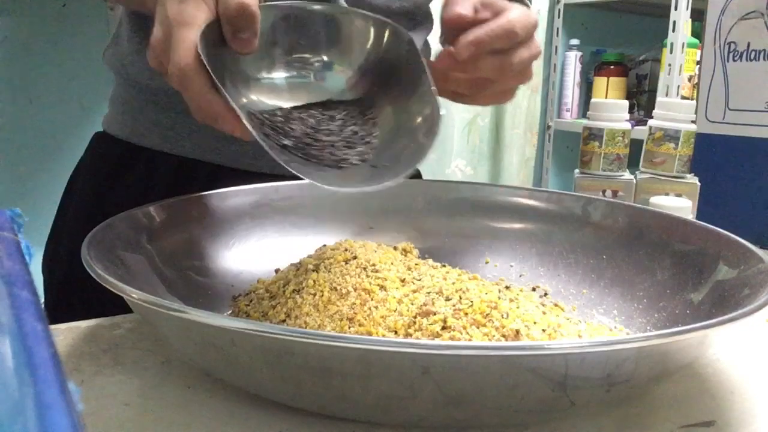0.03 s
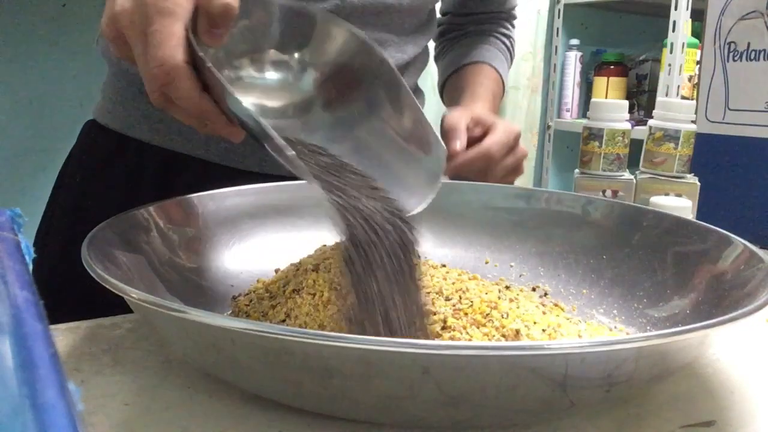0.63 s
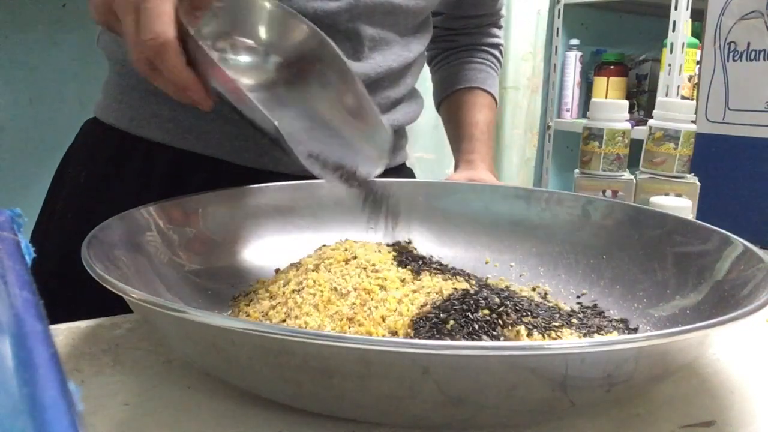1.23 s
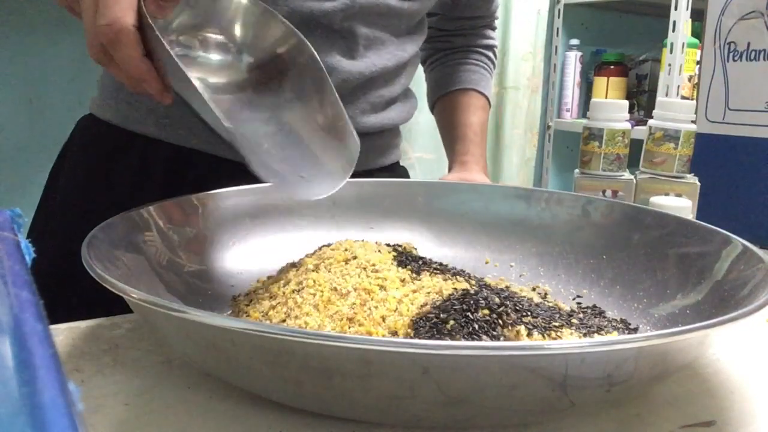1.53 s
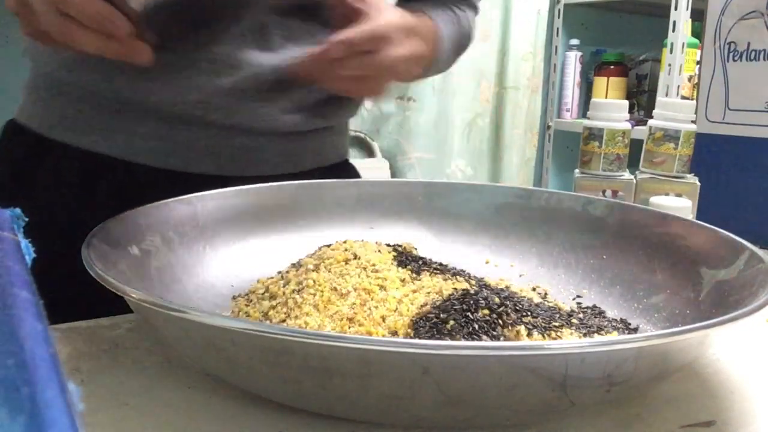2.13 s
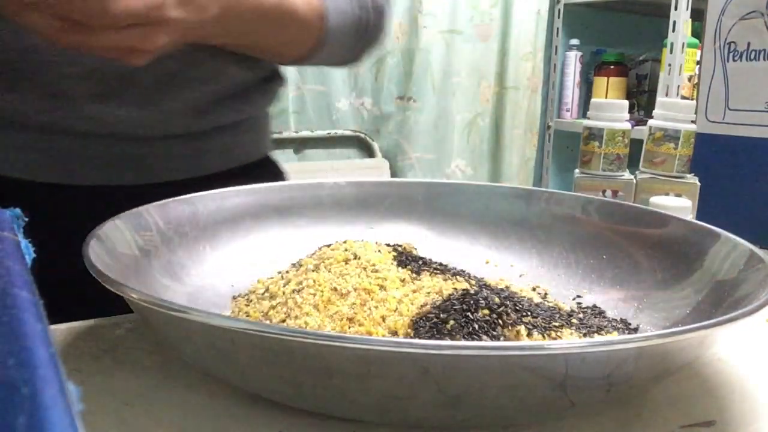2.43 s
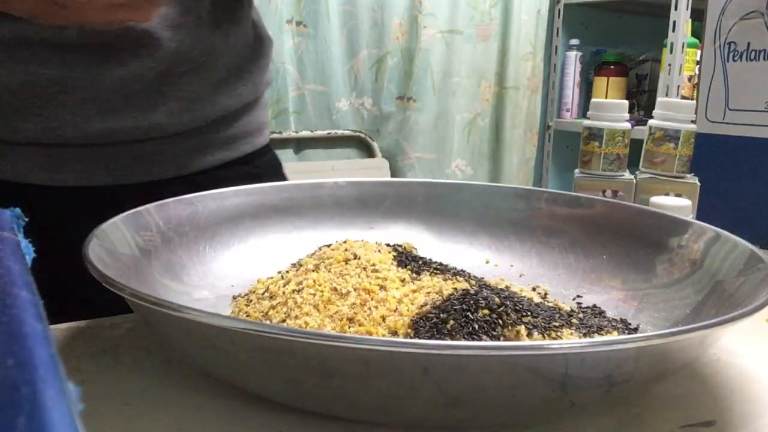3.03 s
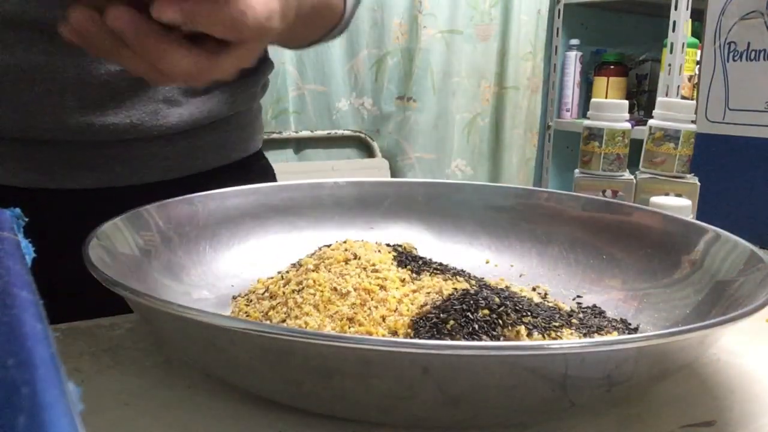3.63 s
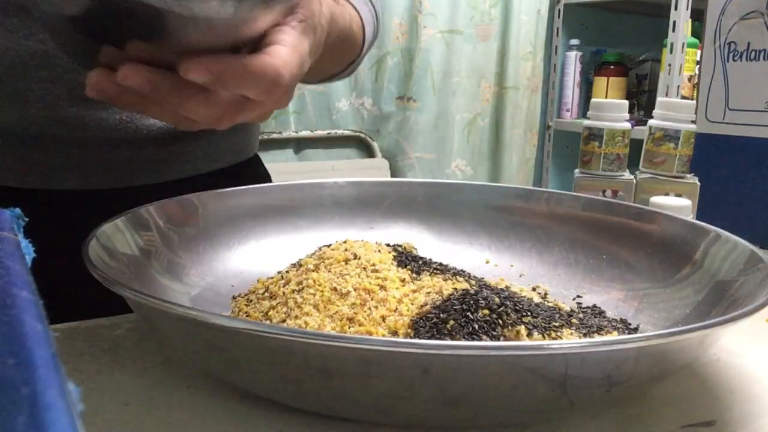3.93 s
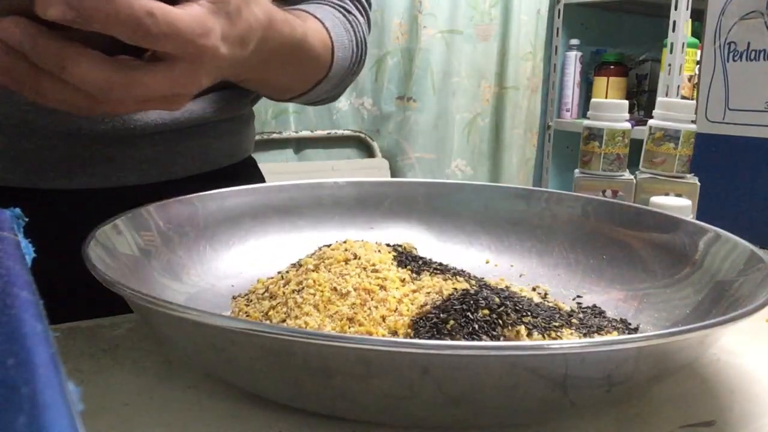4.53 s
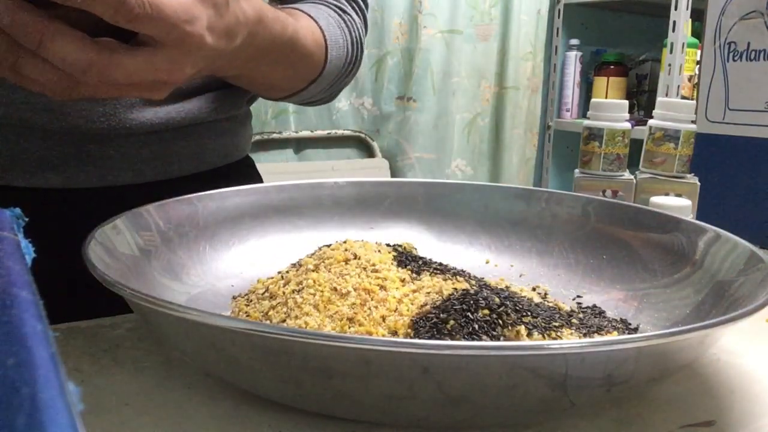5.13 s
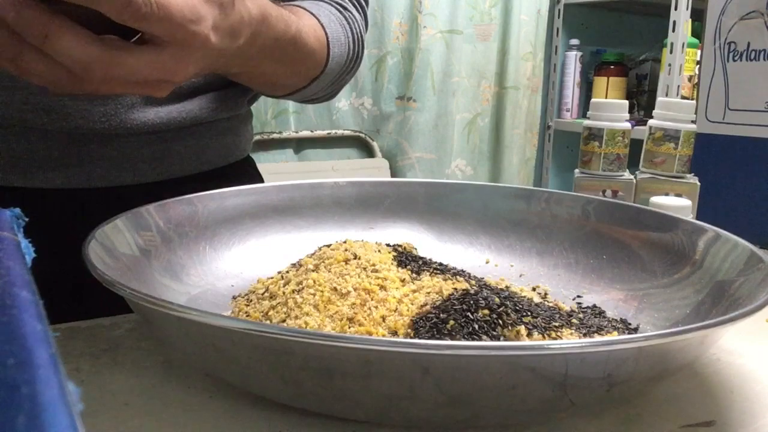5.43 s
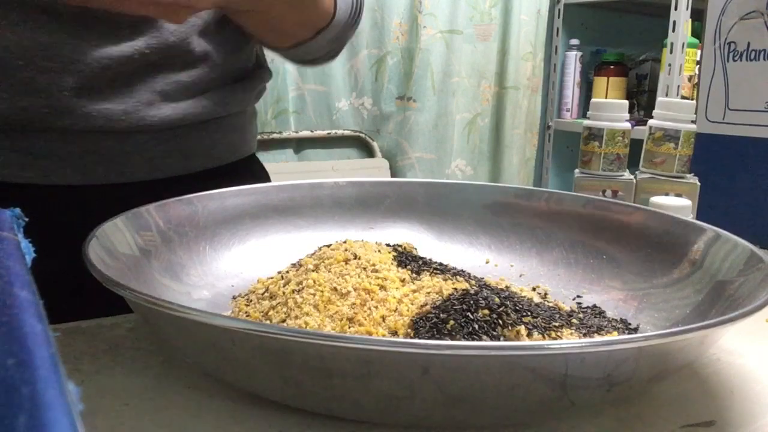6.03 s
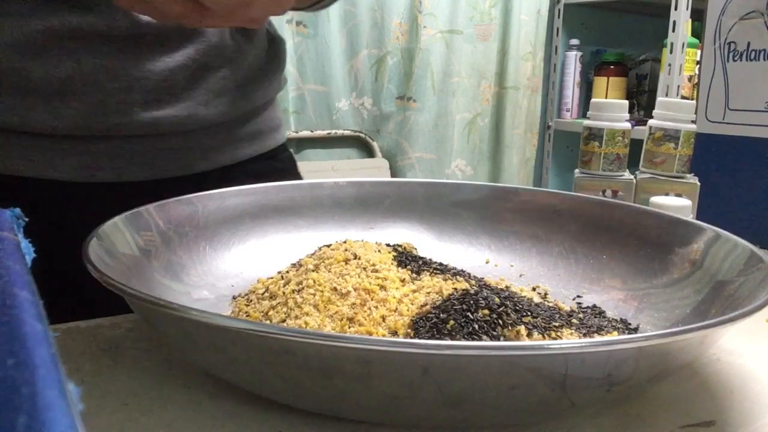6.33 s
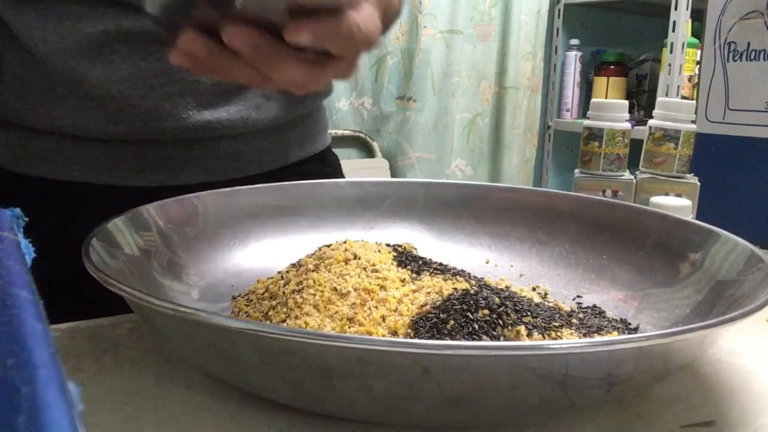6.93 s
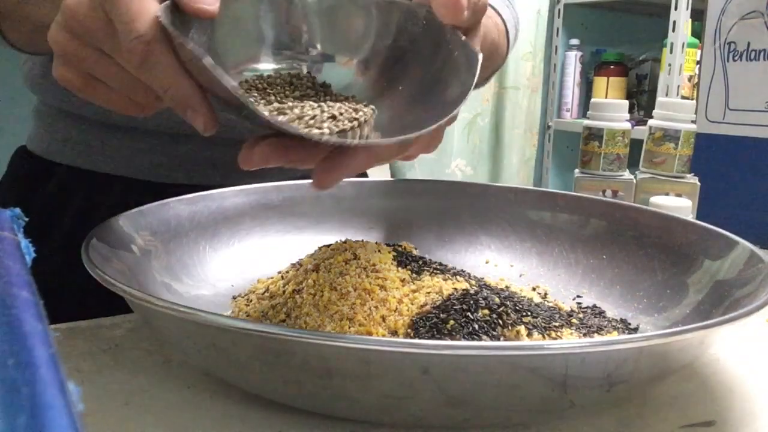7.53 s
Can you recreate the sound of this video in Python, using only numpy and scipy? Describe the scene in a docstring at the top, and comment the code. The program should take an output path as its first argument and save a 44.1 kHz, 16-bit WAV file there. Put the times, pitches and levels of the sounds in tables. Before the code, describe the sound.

Dry seeds hiss off a metal scoop and patter onto a heap of crumbs in a steel bowl. A plastic packet crackles as it is picked up, then more seeds rain into the scoop, making it ring lightly. The packet rustles away amid a few hollow knocks. Cage birds chirp and rasp throughout, a few metres from the close microphone in a small, hard-walled room.

```python
"""A small hard-walled room, one microphone close to a wide steel bowl, cage birds a few metres off.
The birds chirp and rasp from the start and throughout, as seeds hiss off a metal scoop and patter onto
a heap of crumbs in the bowl. Now and then a soft low flutter is heard. At 2.6 s a crackly plastic packet
is picked up, then tipped: seeds rain into the scoop and set it ringing. From 6 s the packet is folded
and put away, and a few seeds creep as the full scoop is tilted."""
import sys
import numpy as np
from scipy import signal
from scipy.fft import rfft, irfft
from scipy.io import wavfile

SR = 44100
rng = np.random.default_rng(int(sys.argv[2]) if len(sys.argv) > 2 else 0)


def int16_out(signal):
    """Quantize to a 16-bit WAV file."""
    q = np.round(np.clip(np.atleast_2d(signal).T, -1, 1) * 32767)
    wavfile.write(sys.argv[1], SR, q.astype(np.int16))


N = 342657
TIME = np.arange(N) / SR

# Every level_db is relative within its table; colours and layer gains follow.
# seeds sliding off the scoop: time_s, level_db
SLIDE = [(0, -51.5), (0.2, -58.5), (0.46, -49), (0.52, -42), (0.64, -50), (1.05, -50.5), (1.28, -61.5),
         (1.56, -66.5), (1.76, -92)]
# clumps of seeds landing on the soft heap: start_s, attack_s, hold_s, release_s, level_db
LANDINGS = [(0.43, 0.12, .01, 0.11, -53), (.58, 0.11, 0.0091, .45, -53.5)]
# seeds creeping as the full scoop is tilted: start_s, attack_s, hold_s, release_s, level_db
CREEPS = [(7.28, 0.1, .01, 0.22, -72), (7.58, 0.093, .01, .2, -66)]
# ringing of the metal scoop: pitch_hz, width_hz, level_db
SCOOP_MODES = [(2360, 37, 11.5), (3584, 75, 9.5), (4650, 26, 9), (5900, 38, 7), (6600, 36, -25),
               (8740, 35, 6), (9820, 134, 6.5), (11220, 130, 3.5), (11700, 110, -10)]
# hoarse calls: start_s, length_s, centre_hz, level_db
RASPS = [(0, 0.028, 3270, -34), (1.786, 0.064, 2400, -47), (1.973, 0.067, 3130, -48),
         (2.183, 0.038, 2780, -44), (3.285, 0.066, 2920, -42.5), (3.397, 0.034, 5060, -40),
         (7.299, .14, 3270, -44.5), (7.609, 0.11, 3540, -41.5), (7.741, 0.071, 4100, -39)]
# pitched calls: start_s, length_s, mid_pitch_hz, level_db, roughness (0-1)
CHIRPS = [(0.03, 0.072, 3780, -32.5, 0.22), (.825, 0.05, 3160, -35.5, 0.11), (.951, .12, 2710, -46.5, .4),
          (1.308, .052, 4400, -35.5, .33), (1.317, 0.042, 2160, -48.5, 0.48),
          (1.441, .06, 3583, -39.5, 0.2), (1.543, 0.06, 3460, -40.5, .27), (1.836, .089, 2650, -52.5, .4),
          (2.055, 0.074, 3580, -42, 0.2), (2.419, 0.069, 3060, -43, 0.37),
          (2.483, 0.058, 2877, -42.5, 0.69), (3.26, .049, 3444, -36.5, .33),
          (3.342, .05, 2997, -40.5, 0.34), (5.112, 0.065, 4257, -31.5, 0.46),
          (5.723, 0.059, 3150, -41.5, 0.56), (5.795, 0.054, 3047, -41.5, 0.45),
          (6.914, .082, 3210, -43, 0.46), (6.977, .099, 2630, -47, 0.58)]
WHISTLES = [(.28, 0.058, 4544, -52.5, .08), (.445, 0.12, 4754, -48, 0.07), (.878, 0.0543, 3830, -26, .3),
            (1.455, 0.038, 1760, -55, 0.08), (1.643, 0.031, 5130, -45, 0.09),
            (2.245, 0.0864, 4006, -30, .24), (3.129, 0.078, 2980, -51.5, 0.03),
            (3.398, 0.032, 5990, -40, 0)]
SQUAWKS = [(.766, 0.046, 3710, -36.5, 0.3), (.797, 0.035, 5480, -23.5, 0.4),
           (2.201, 0.067, 3780, -33, 0.42), (3.195, 0.025, 4070, -36.5, 0.38),
           (5.188, .15, 3696, -33.5, .4), (6.594, 0.066, 3470, -44.5, 0.76)]
# soft low flutters: start_s, length_s, level_db
FLUTTERS = [(0.771, 0.18, -48), (2.22, 0.12, -55), (2.999, 0.16, -37), (6.53, 0.12, -48)]
# the last seeds of each pour: start_s, attack_s, hold_s, release_s, level_db
STRAGGLERS = [(1.3, .15, .15, .1, -65.5), (5.45, .2, 0.24, .15, -54)]
# the packet lifted and gripped, later folded and put down: start_s, attack_s, hold_s, release_s, level_db
RUSTLES = [(2.58, 0.087, 0.19, 0.11, -45), (2.78, 0.13, 0.22, .05, -40), (3.03, 0.053, 0.027, 0.033, -36.5),
           (6.04, .22, 0.53, 0.17, -43.5), (6.58, 0.11, 0.14, 0.1, -44), (6.9, 0.052, 0.011, 0.074, -36)]
# creases of the packet snapping: start_s, level_db
CREASES = [(2.8837, -31.5), (2.9066, -24.5), (2.926, -23.5), (2.9387, -21), (3.0002, -25), (3.0039, -22),
           (3.017, -23), (3.046, -20.5), (3.068, -16.5), (3.082, -18.5), (3.0935, -18.5), (3.1024, -23),
           (3.1094, -25), (4.677, -29), (4.6965, -26.5), (4.92, -33.5), (6.408, -34.5), (6.4119, -30),
           (6.796, -33), (6.8118, -29), (6.9532, -38)]
# single seeds hitting the scoop: start_s, level_db
TICKS = [(2.6419, -35), (3.6352, -33), (3.655, -34.5), (3.916, -40), (4.535, -38), (4.5782, -27.5),
         (4.6454, -30), (5.585, -37.5), (5.7393, -30), (5.7641, -32), (5.8253, -35.5), (5.876, -39.5),
         (6.0218, -36.5), (6.055, -33), (6.5458, -36)]
# seeds shifting in the packet as it tips: start_s, attack_s, hold_s, release_s, level_db
SHIFTS = [(3.68, 0.27, 0.93, 2.1, -43.5), (3.92, 0.095, 0.013, 0.087, -37), (4.28, 0.067, .01, 0.08, -49),
          (6.08, 0.14, 0.045, .16, -43.5), (6.36, 0.07, 0.12, 0.11, -45.5)]
# trickle, main pour, surge and last shake into the scoop: start_s, attack_s, hold_s, release_s, level_db
REFILL_POURS = [(3.8, 0.26, 1.52, .4, -58), (4.47, 0.28, 0.6, .36, -37), (4.76, .11, 0.014, 0.11, -37.5),
                (5.7, 0.072, 0.014, 0.15, -49)]
# hollow knocks of the scoop being handled: start_s, pitch_hz, level_db
KNOCKS = [(2.649, 845, -37), (2.6745, 990, -36.5), (2.7954, 1300, -27), (3.2586, 1390, -37),
          (3.367, 1140, -35.5), (3.591, 2000, -42), (3.6395, 1480, -41), (4.001, 1600, -25),
          (5.9655, 1460, -37.5), (6.322, 1400, -33), (6.7011, 700, -29.5), (6.9534, 1087, -32),
          (7.078, 2680, -29)]

# spectrum of each sound: frequency_hz, level_db
SLIDE_COLOUR = [(700, -27), (2000, -5.5), (3500, 3), (5300, -1), (7000, 7), (10000, 5.5), (12500, 8),
                (16000, -0.5)]
LANDING_COLOUR = [(200, -13), (600, -14), (1000, -0.5), (1500, -4), (1800, -5), (2500, -3), (4000, -5),
                  (9000, -28)]
VOICE_COLOUR = [(800, -9.5), (2000, -0.5), (3700, 0.5), (5000, -2), (6700, -0.5), (8000, 2), (9500, 2.5),
                (10400, -6.5), (11500, 2), (13000, -8), (16000, -11)]
FLUTTER_COLOUR = [(30, -49), (80, -0.5), (160, -1.5), (280, -11.5), (500, -16), (1200, -27)]
TICK_COLOUR = [(800, -30), (2500, 0), (6000, -1), (8000, 6.5), (10000, 4), (13000, 6), (16000, -1)]
RUSTLE_COLOUR = [(40, -4.5), (90, -3), (200, -3), (400, -3), (800, -1.5), (1300, -1.5), (2500, -6),
                 (4800, -11), (7500, -9.5), (12000, -20), (16000, -30)]
CRACK_COLOUR = [(1000, -7), (3000, 0), (5000, -0.5), (6800, 3), (9000, -6), (13000, -9.5), (16000, -17)]
POP_COLOUR = [(50, -44), (170, 2), (350, 2), (800, -0.5), (1250, 2), (2500, -4), (4000, -4), (9000, -50)]
SHIFT_COLOUR = [(80, -16), (300, -15), (550, -5), (850, -8.5), (1400, 4), (2100, 0.5), (2600, 3),
                (3800, -1.5), (5000, -9.5), (9000, -11.5), (16000, -30)]
REFILL_COLOUR = [(900, -23), (2000, -6.5), (3300, -6.5), (4300, -3), (5300, -5), (6000, -2.5), (7000, 5.5),
                 (8000, 1), (10500, -1.5), (11400, 2), (12600, 8), (13600, 1.5), (16000, 5.5)]
ROOM_TONE_COLOUR = [(20, -40), (40, -5), (53, 3), (70, 2), (110, -3.5), (200, -9), (400, -13), (900, -18),
                    (2000, -15.5), (3500, -13), (7000, -23), (16000, -36.5)]


def from_db(db):
    """Decibels to gain."""
    return 10 ** (np.asarray(db) / 20)


def rms_one(x):
    """Scale to rms 1."""
    return x / np.sqrt(np.mean(x ** 2) + 1e-20)


def add(track, start_s, sound):
    """Mix a short sound in at start_s."""
    start = int(np.clip(round(start_s * SR), 0, N - 1))
    track[start:start + len(sound)] += sound[:N - start]


def level_curve(rows, fade_s=0.011):
    """Gain along a dB curve, fading to silence outside it."""
    time_s, db = np.transpose(rows)
    inside_s = np.minimum(TIME - time_s[0], time_s[-1] - TIME)
    return from_db(np.interp(TIME, time_s, db)) * np.clip(inside_s / fade_s + 1, 0, 1)


def swells(rows):
    """Gain of overlapping gestures, each with an attack, a hold and a release."""
    gain = np.zeros(N)
    for start_s, attack_s, hold_s, release_s, db in rows:
        corners_s = np.cumsum([0, attack_s, hold_s, release_s])
        gain += from_db(db) * np.interp(TIME - start_s, corners_s, [0, 1, 1, 0]) ** 2
    return gain


def drift(hz, length):
    """Smooth random motion of rms 1, mostly slower than hz."""
    pole = np.exp(-2 * np.pi * hz / SR)
    noise = rng.standard_normal(length + SR // 10)
    return rms_one(signal.lfilter([1], [1, -2 * pole, pole * pole], noise)[-length:])


def coloured(x, colour, size=4096):
    """Minimum-phase filter of unit energy with the given spectrum."""
    hz, db = np.transpose(colour)
    grid_hz = np.maximum(np.fft.rfftfreq(size, 1 / SR), 1)
    gain = from_db(np.interp(np.log(grid_hz), np.log(hz), db))
    cepstrum = irfft(np.log(gain))
    causal = 2 * cepstrum[:size // 2] * (np.arange(size // 2) > 0)
    response = irfft(np.exp(rfft(causal, size)))
    return signal.oaconvolve(x, response / np.linalg.norm(response))[:len(x)]


def resonance(x, hz, width_hz):
    """Two-pole resonance with gain 1 at its peak."""
    radius = np.exp(-np.pi * width_hz / SR)
    feedback = [1, -2 * radius * np.cos(2 * np.pi * hz / SR), radius ** 2]
    return signal.lfilter(np.array([1, 0, -1]) * (1 - radius ** 2) / 2, feedback, x + 1e-18)


def grains(gain, per_s, spread_db, clump_db, clump_hz):
    """Random collisions of uneven size, in clumps; about per_s a second at the strongest flow."""
    chance = np.clip(per_s * (gain / gain.max() + 0.041) / SR, 1e-6, 1)
    sizes = from_db(spread_db * np.minimum(rng.exponential(1, N), 5))
    kicks = rms_one(sizes * rng.choice([-1, 1], N))
    clumps = rms_one(from_db(clump_db * drift(clump_hz, N)))
    return gain * clumps * kicks * (rng.random(N) < chance) / np.sqrt(chance)


def burst(decay_s, tail_s, size=2048):
    """A jagged contact noise with a weak tail; it has the energy of 4 ms at rms 1."""
    t = np.arange(size) / SR
    envelope = np.exp(-t / decay_s) + from_db(-19) * np.exp(-t / tail_s)
    sound = rng.standard_normal(size) * envelope
    return sound / np.linalg.norm(sound) * np.sqrt(0.004 * SR)


def scoop(hits, colour, ring_db):
    """Seed husks click and set the thin metal ringing."""
    ringing = sum(from_db(db) * resonance(hits, hz, width_hz) for hz, width_hz, db in SCOOP_MODES)
    return coloured(hits + from_db(ring_db) * ringing, colour)


def sliding_seeds():
    """Seeds hiss over the scoop and patter on the heap; at the end a few creep in the scoop."""
    flow = level_curve(SLIDE) + swells(CREEPS)
    sliding = grains(flow, per_s=11000, spread_db=1.5, clump_db=1, clump_hz=40)
    landing = grains(swells(LANDINGS), per_s=2500, spread_db=1, clump_db=1, clump_hz=30)
    hiss = scoop(sliding, SLIDE_COLOUR, ring_db=-5.5)
    return from_db(5.5) * hiss + from_db(4) * coloured(landing, LANDING_COLOUR)


def bird_rasps(buzz_hz=780, jitter=0.11, hiss=0.52, lower_width_hz=2300, upper_width_hz=4400):
    """Unsteady pulses with some hiss, through two broad resonances of the bird's throat."""
    out = np.zeros(N)
    for start_s, length_s, hz, db in RASPS:
        n = int(length_s * SR)
        cycles = np.cumsum(buzz_hz * (1 + jitter * drift(40, n))) / SR
        pulses = np.diff(np.floor(cycles), prepend=0) * from_db(2.3 * drift(220, n))
        buzz = rms_one(pulses) + hiss * rng.standard_normal(n)
        upper_hz = 1.27 * hz
        lower = resonance(resonance(buzz, hz, lower_width_hz), hz, lower_width_hz)
        upper = resonance(resonance(buzz, upper_hz, upper_width_hz), upper_hz, upper_width_hz)
        throat = rms_one(lower) + from_db(-1) * rms_one(upper)
        add(out, start_s, from_db(db) * rms_one(throat * signal.windows.hann(n)))
    return signal.sosfilt(signal.butter(4, 10000, fs=SR, output="sos"), out)


def bird_calls(rows, glide_octaves, waver_hz=130, pitch_swing=0.1366, swing_db=8, full_voice_db=-34.5):
    """Gliding tones, brighter when louder; a rough one wavers in pitch and level."""
    out = np.zeros(N)
    for start_s, length_s, hz, db, roughness in rows:
        n = int(length_s * SR)
        glide_hz = hz * 2 ** (glide_octaves * np.linspace(-0.5, 0.5, n))
        pitch_hz = glide_hz * (1 + pitch_swing * roughness * drift(waver_hz, n))
        phase = 2 * np.pi * np.cumsum(pitch_hz) / SR
        # a slower membrane of the syrinx adds sidebands
        phase += 1.6 * roughness * np.sin(0.24 * phase + drift(waver_hz, n))
        overtones = np.sin(2 * phase) + from_db(-11) * np.sin(3 * phase)
        overtones_db = -7 - 1.67 * max(full_voice_db - db, 0)
        tone = np.sin(phase) + from_db(overtones_db) * overtones
        tone *= from_db(swing_db * roughness * drift(waver_hz, n))
        add(out, start_s, from_db(db) * rms_one(tone * signal.windows.tukey(n, 0.4)))
    return out


def far_chatter(count=24, length_s=0.049, range_hz=(1620, 3530), level_db=-60.5):
    """Birds in the farther cages call softly at random; gives rows like those of CHIRPS."""
    return [(when * N / SR, length_s, np.interp(pitch, [0, 1], range_hz), level_db, roughness / 2)
            for when, pitch, roughness in rng.random((count, 3))]


def cage_birds():
    """Chirps fall, squawks rise harshly, whistles stay nearly level; hoarse calls come between."""
    chirps = bird_calls(CHIRPS + far_chatter(), glide_octaves=-0.3)
    squawks = bird_calls(SQUAWKS, glide_octaves=0.36)
    whistles = bird_calls(WHISTLES, glide_octaves=-0.03)
    return from_db(-4) * coloured(chirps + squawks + whistles + bird_rasps(), VOICE_COLOUR)


def flutters():
    """Brief lumpy puffs in the bass."""
    out = np.zeros(N)
    for start_s, length_s, db in FLUTTERS:
        n = int(length_s * SR)
        add(out, start_s, from_db(db) * signal.windows.tukey(n, 0.5) * rng.standard_normal(n))
    return coloured(out, FLUTTER_COLOUR)


def stragglers():
    """Sparse seeds bounce on the metal as a pour runs out."""
    bounces = grains(swells(STRAGGLERS), per_s=100, spread_db=1.5, clump_db=1, clump_hz=16)
    return from_db(1) * scoop(bounces, TICK_COLOUR, ring_db=5)


def packet(wall_hz=(1000, 2100), firm_crack_db=-23, firm_pop_db=-29):
    """Each crease cracks and pops a patch of plastic wall at its own pitch, over small crinkles."""
    cracks, pops = np.zeros(N), np.zeros(N)
    for start_s, crack_db in CREASES:
        add(cracks, start_s, from_db(crack_db) * burst(decay_s=0.0014, tail_s=0.015))
        pop = burst(decay_s=0.003, tail_s=0.025)
        pop += from_db(4) * resonance(pop, rng.uniform(*wall_hz), width_hz=420)
        # the pop grows less than the crack, so harder creases are brighter
        pop_db = firm_pop_db + 0.26 * (crack_db - firm_crack_db)
        add(pops, start_s, from_db(pop_db) * pop)
    crinkles = grains(swells(RUSTLES), per_s=3000, spread_db=2.7, clump_db=2.8, clump_hz=55)
    snaps = coloured(cracks, CRACK_COLOUR) + coloured(pops, POP_COLOUR)
    return snaps + coloured(crinkles, RUSTLE_COLOUR)


def refill():
    """Seeds shift in the packet and rain into the scoop; single ones tick loudly."""
    shifting = grains(swells(SHIFTS), per_s=4000, spread_db=0.24, clump_db=1.85, clump_hz=45)
    raining = grains(swells(REFILL_POURS), per_s=6000, spread_db=2.4, clump_db=1.3, clump_hz=50)
    ticks = np.zeros(N)
    for start_s, db in TICKS:
        add(ticks, start_s, from_db(db) * burst(decay_s=0.0021, tail_s=0.015))
    return (from_db(2.5) * coloured(shifting, SHIFT_COLOUR)
            + from_db(4.5) * scoop(raining, REFILL_COLOUR, ring_db=6)
            + scoop(ticks, TICK_COLOUR, ring_db=-2.5))


def scoop_knocks(width_hz=900, click_db=-17):
    """A short contact sounds one broad resonance, with a little of its own click."""
    out = np.zeros(N)
    for start_s, hz, db in KNOCKS:
        contact = burst(decay_s=0.0016, tail_s=0.02)
        hollow = resonance(resonance(contact, hz, width_hz), hz, 2 * width_hz)
        knock = rms_one(hollow) * np.std(contact) + from_db(click_db) * contact
        add(out, start_s, from_db(db) * knock)
    return out


def room(x, first_echo_s=0.0089, t60_s=0.38, treble_t60_s=0.24):
    """Diffuse echoes off the hard walls, of unit energy; the treble dies sooner."""
    t = TIME[:SR]
    noise = rng.standard_normal(SR)
    low = signal.sosfilt(signal.butter(1, 6000, fs=SR, output="sos"), noise)
    treble = noise - low
    tail = low * from_db(-60 * t / t60_s) + treble * from_db(-60 * t / treble_t60_s)
    tail *= t > first_echo_s
    return signal.oaconvolve(x, tail / np.linalg.norm(tail))[:N]


def scene():
    """At the microphone: seeds and packet close and nearly dry, the birds as much echo as direct."""
    near = sliding_seeds() + refill() + stragglers() + packet() + scoop_knocks() + flutters()
    birds = cage_birds()
    room_tone = from_db(-56) * coloured(rng.standard_normal(N), ROOM_TONE_COLOUR)
    echoes = room(from_db(-18) * near + birds)
    return (near + birds + echoes + room_tone)[None]


def record(dry, cutoff_hz=15900):
    """The top of the treble is cut steeply."""
    return signal.sosfilt(signal.ellip(12, 0.1, 80, cutoff_hz, fs=SR, output="sos"), dry)


dry = scene()
out = record(dry)
int16_out(out)
```